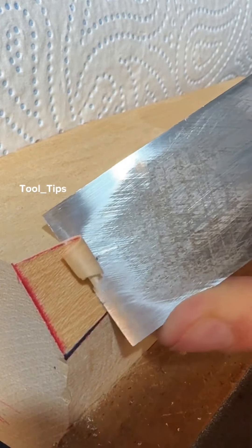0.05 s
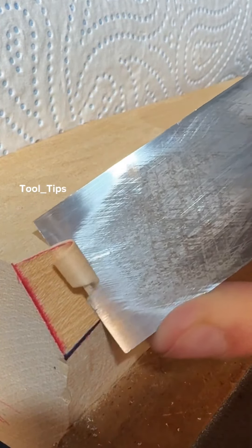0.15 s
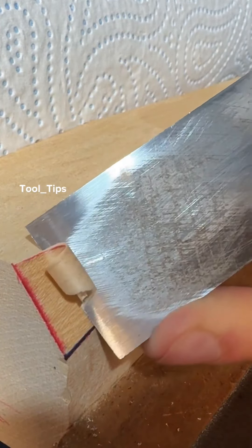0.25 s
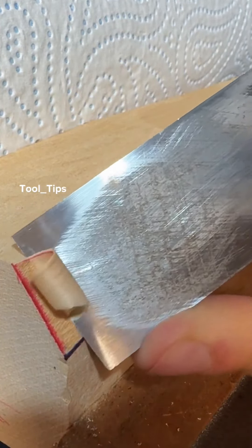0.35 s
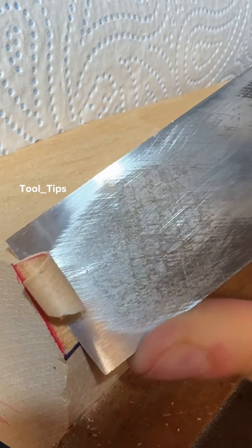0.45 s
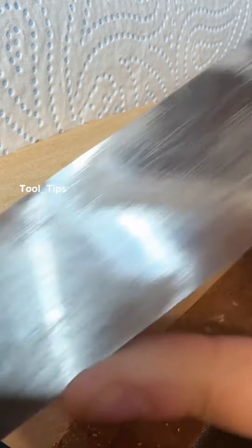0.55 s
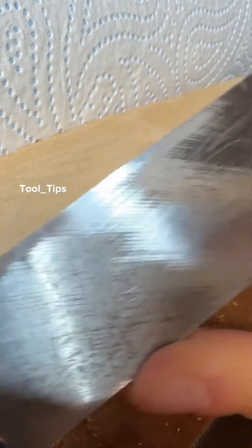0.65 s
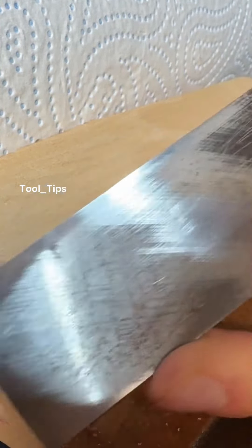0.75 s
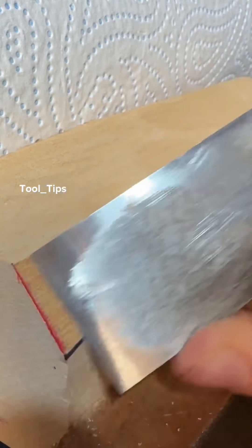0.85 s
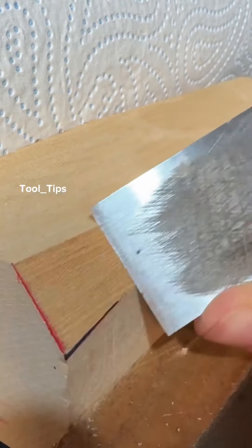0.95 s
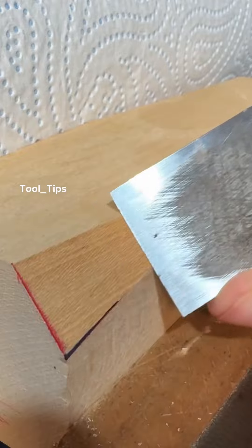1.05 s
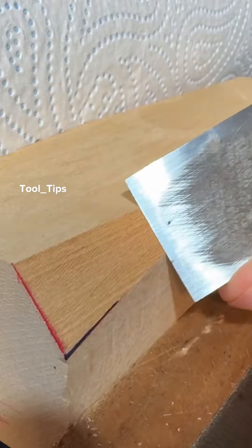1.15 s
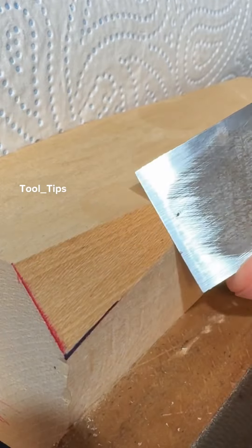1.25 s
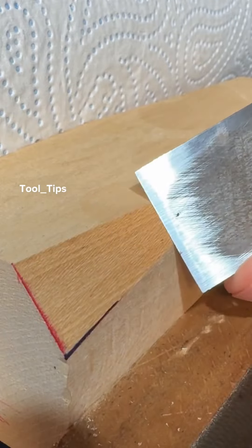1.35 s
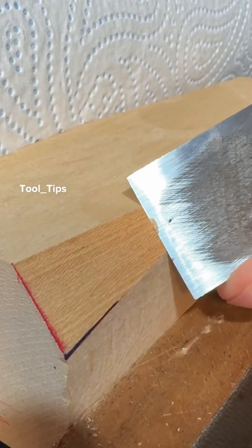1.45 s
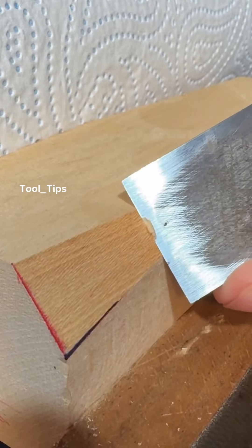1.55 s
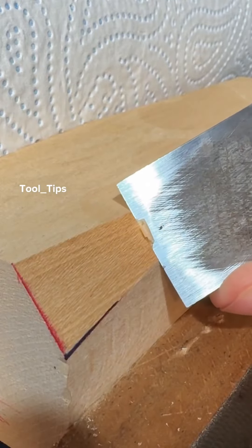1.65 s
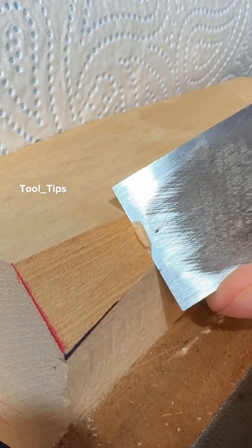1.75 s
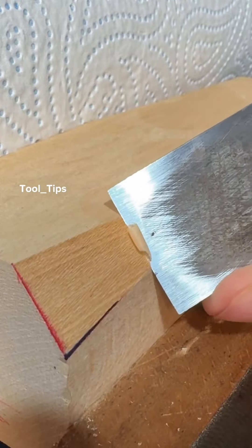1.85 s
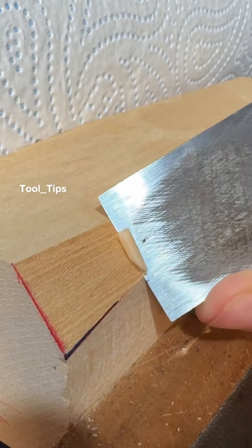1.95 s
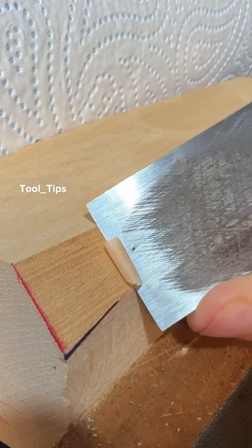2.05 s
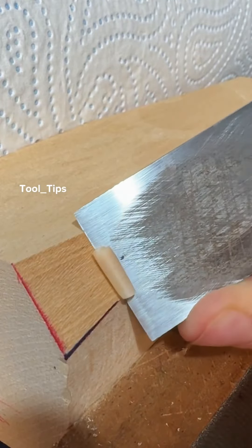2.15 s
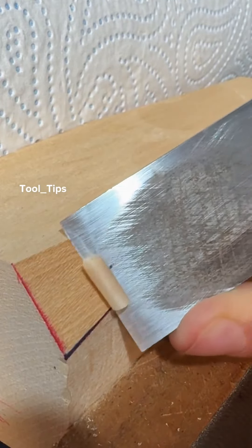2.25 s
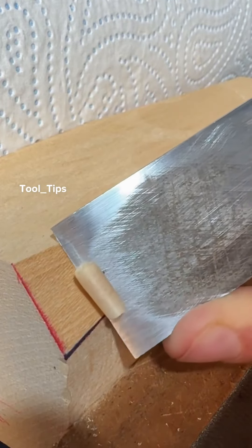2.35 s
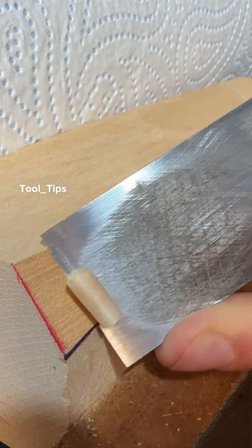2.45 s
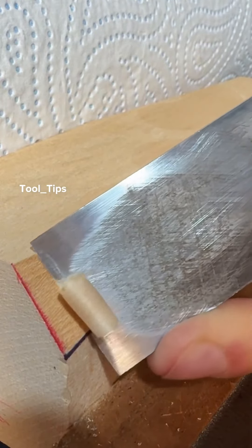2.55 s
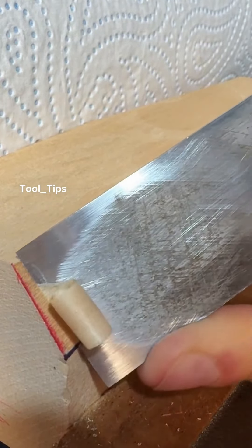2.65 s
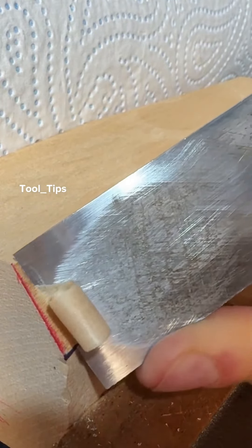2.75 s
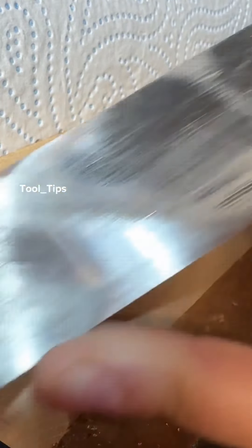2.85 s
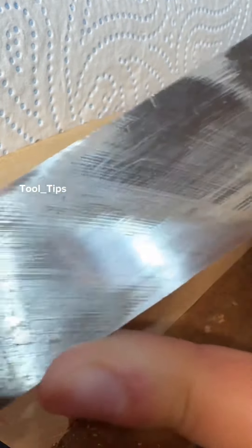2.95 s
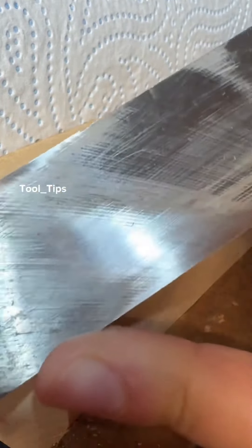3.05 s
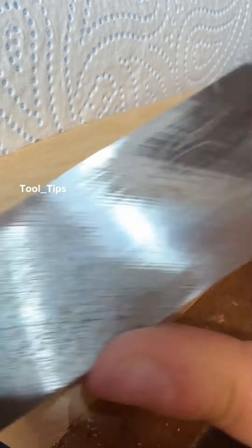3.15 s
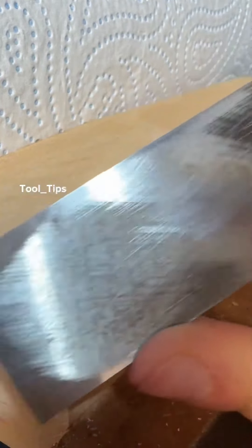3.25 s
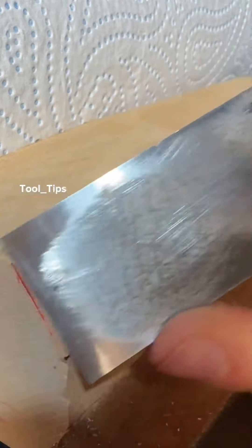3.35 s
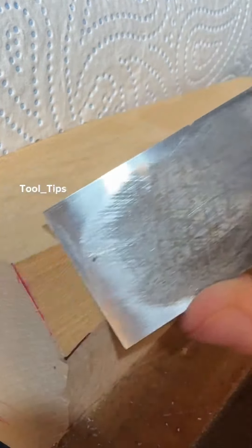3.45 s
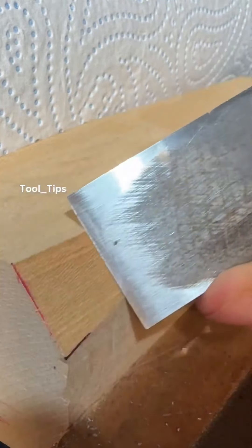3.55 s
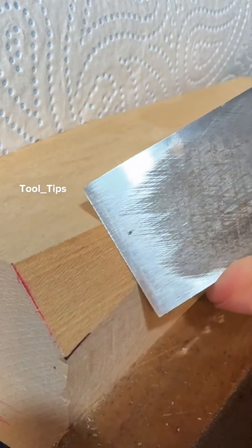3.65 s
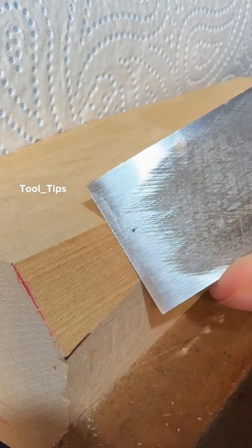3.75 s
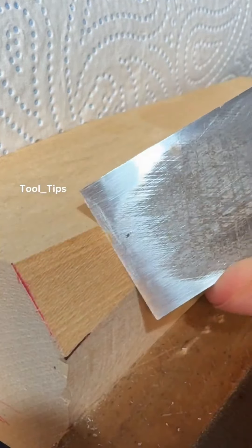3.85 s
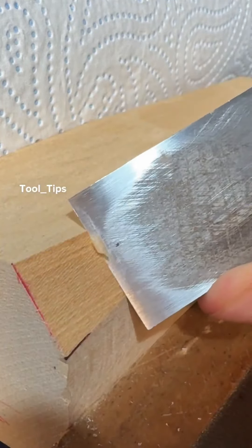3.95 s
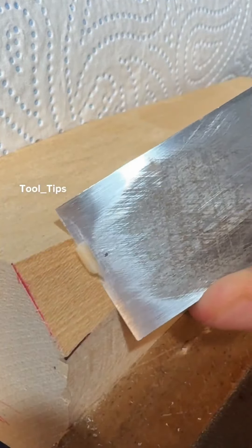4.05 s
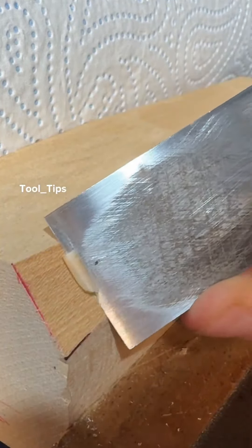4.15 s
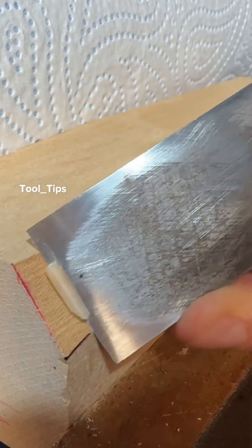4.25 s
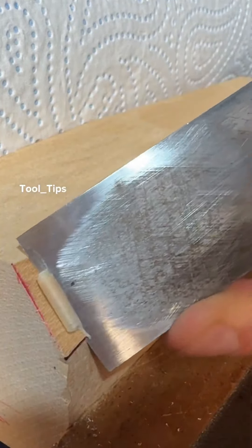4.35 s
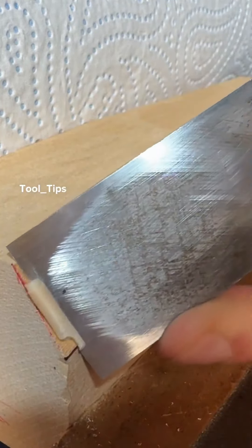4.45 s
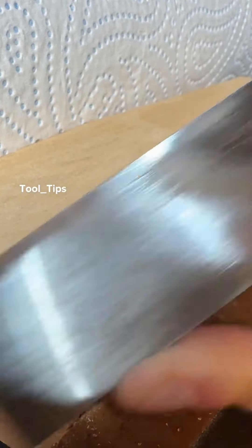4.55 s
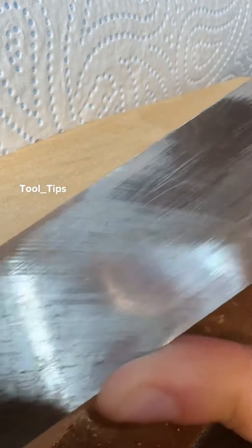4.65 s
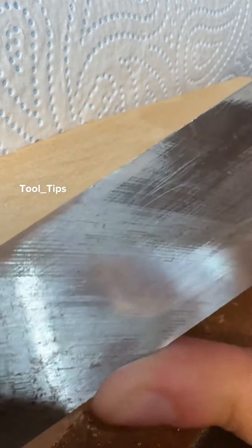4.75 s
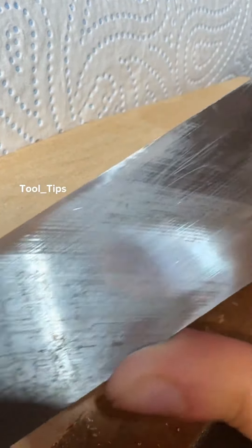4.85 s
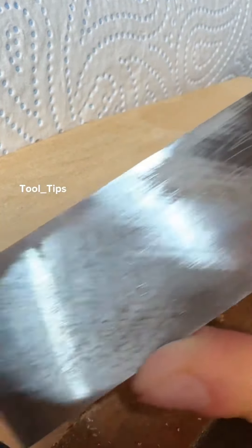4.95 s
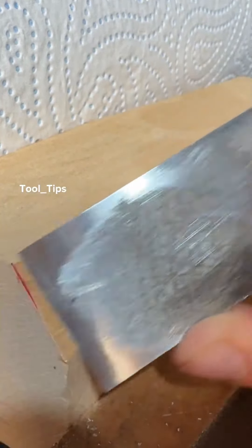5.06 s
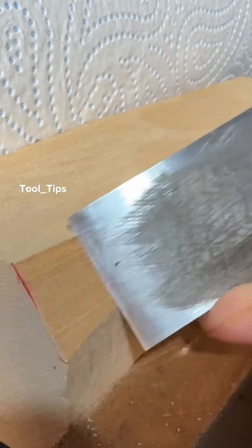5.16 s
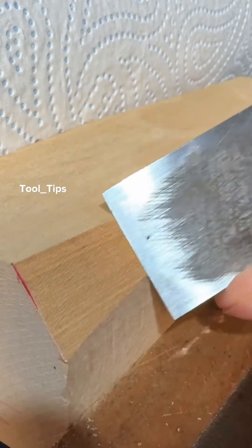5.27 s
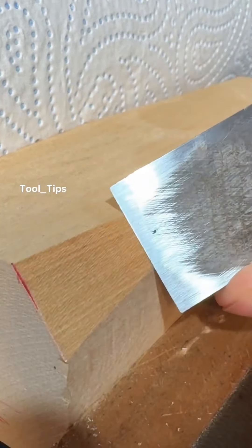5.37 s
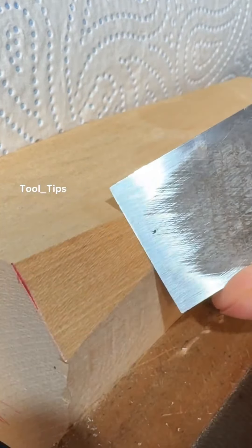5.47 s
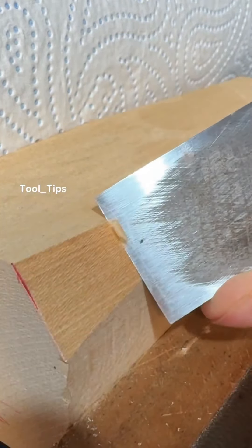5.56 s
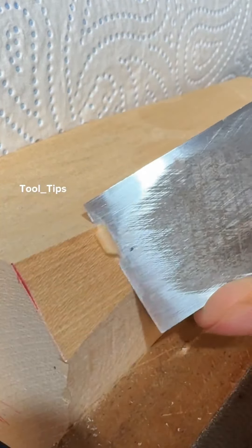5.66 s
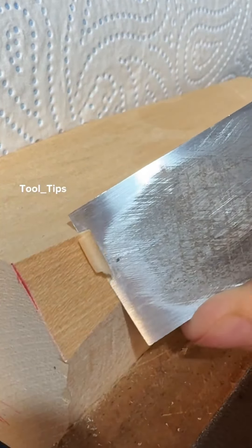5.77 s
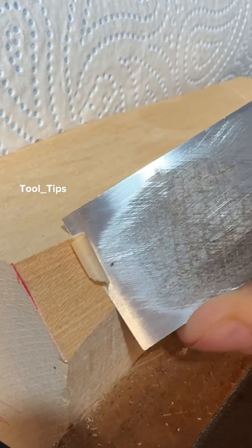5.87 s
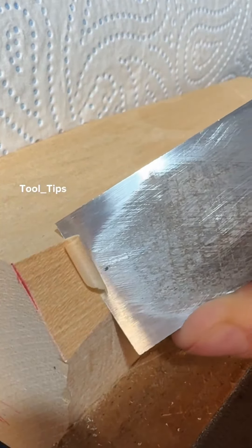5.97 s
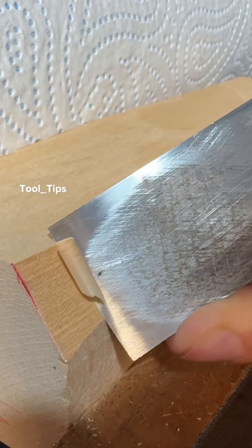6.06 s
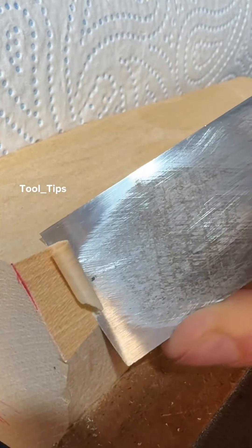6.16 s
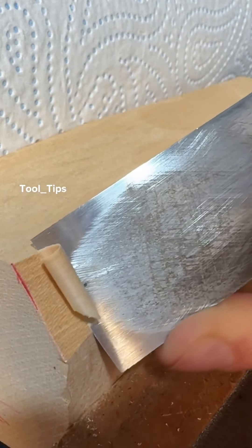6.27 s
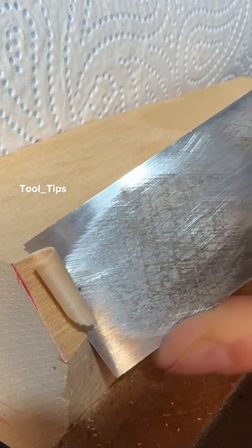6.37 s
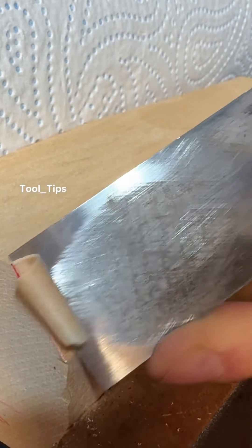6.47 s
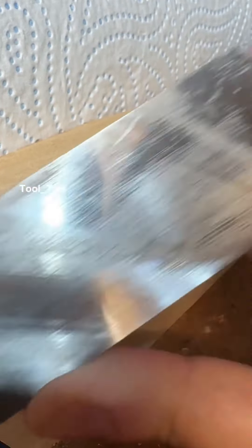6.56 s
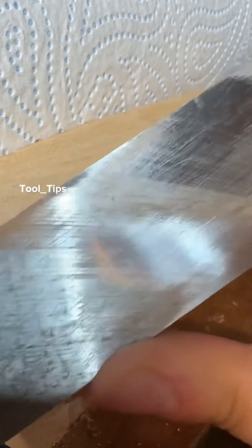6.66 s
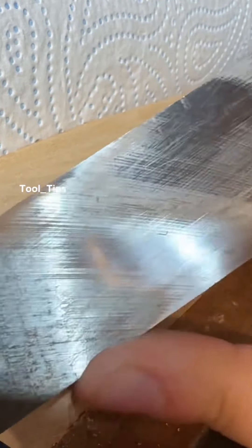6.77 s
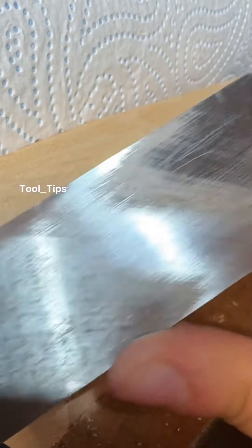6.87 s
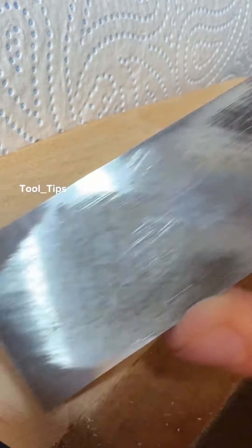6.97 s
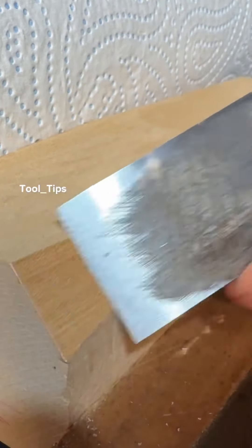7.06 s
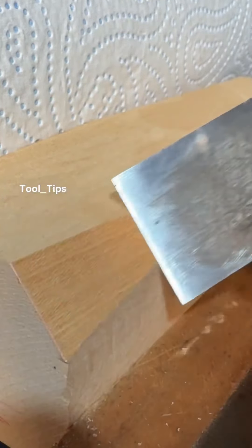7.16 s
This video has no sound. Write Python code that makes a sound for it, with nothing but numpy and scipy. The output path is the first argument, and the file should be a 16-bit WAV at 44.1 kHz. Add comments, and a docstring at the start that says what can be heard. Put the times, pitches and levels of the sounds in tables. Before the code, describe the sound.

A hand scraper shaves a wooden block on a bench, heard from centimetres away with little echo. Gritty, fibrous scraping comes in uneven pulls, growing coarser until the shaving rips away and the bench thuds. The blade then rubs back quietly with thin hiss, scuffs and ticks. Four cuts are heard; the last two releases bring strong knocks, one dull and faintly ringing, one bright and hard. Faint room air lies below.

```python
"""In a small, dry workshop, a phone lies close to a bench where a steel card scraper cuts a wooden block four times.
Surging noise of tearing fibres rings the modes of block and blade, and each shaving tears off in a last pull.
The bench thumps in decaying modes; bumps and crumpling bursts ring wood modes with noise clatter, two of them
loud, the first dull, the second hard and bright. The freed blade sounds a note. Between cuts it slides lightly
back with a finer hiss; noise cracks make ticks, and bench rumble lies below. Two microphone ports hear it with
glances off the bench, a short noise-built echo and quiet room air."""
import sys
import numpy as np
from scipy import signal
from scipy.fft import rfft, irfft
from scipy.io import wavfile
from scipy.ndimage import uniform_filter1d

SR = 44100
rng = np.random.default_rng(int(sys.argv[2]) if len(sys.argv) > 2 else 0)


def inscribe(sig):
    """Save sig as 16-bit PCM at rate SR to the path in sys.argv[1].

    A 1-D sig is mono; a 2-D sig holds one channel per row.
    Samples are clipped to [-1, 1] before scaling.
    """
    pcm = np.round(np.clip(np.atleast_2d(sig).T, -1, 1) * 32767)
    wavfile.write(sys.argv[1], SR, pcm.astype(np.int16))


N = 317940
TIME = np.arange(N) / SR
FREQS = np.fft.rfftfreq(8192, 1 / SR)
RING_TIME = TIME[:SR // 2]  # half a second for each single event

# Resonances of block and blade pressed together: f/Hz, width/Hz, level over the broad spectrum/dB
BODY_MODES = [(197, 27, 7), (354, 33.5, 13.5), (471, 50, 10), (610, 14, 18.5), (781, 35, 7),
              (1033.3, 24.3, 17.5), (1335, 38, 13.5), (1572, 69, 12.5), (1853, 42, 7), (2070, 20, 11.5),
              (2277, 98, 9), (2316, 69, 13.5), (2580, 30, -12), (3780, 1030, 0), (5725, 21, 3),
              (6670, 57, 11), (7003, 200, 11.5), (7540, 980, 3.5)]
# Range of the blade's main resonances: lower f/Hz, upper f/Hz
BLADE_RANGE = (1800, 3200)
# Broad spectrum of cutting: f/Hz, level/dB
CUT_SPECTRUM = [(170, 0.5), (400, -11.5), (800, -11.5), (1200, -19.5), (2000, -8), (3000, -11.5),
                (4700, -18), (6000, -13), (8400, -16), (9600, -9), (13000, -19.5), (15200, -7.5)]
# Surges of the edge between stalls: start t/s, length t/s, level before band trims/dB,
# weight of the wood/dB, extra ring of the blade/dB
EDGE_SURGES = [(-.03, 0.084, -31.5, -6, 3), (0.085, 0.13, -37, -1.5, 0), (0.221, 0.12, -40, -7.5, 0),
               (0.277, 0.087, -34, -1, -2), (0.506, 0.013, -35.5, -5, 8), (0.585, 0.06, -45.5, 0, -1),
               (1.371, 0.098, -43, -3.5, 2.5), (1.506, 0.095, -41, -3, 2.5), (1.654, 0.12, -47, -1.5, 2),
               (1.799, 0.12, -40.5, -1.5, 0.5), (1.92, 0.089, -38, 0.5, 2), (2, 0.11, -42, -3, -1),
               (2.084, 0.086, -36.5, -1.5, 0.5), (2.181, 0.11, -36.5, 0.5, -3.5),
               (2.361, 0.11, -38.5, -3, -3), (2.484, 0.058, -44, -4.5, -1), (2.543, 0.059, -35, -3.5, -1.5),
               (2.602, 0.033, -35.5, 3.5, 1), (3.8, 0.12, -38.5, -4.5, 3), (3.968, 0.11, -36, -5, 1.5),
               (4.089, 0.14, -41.5, 2.5, 1.5), (4.167, 0.065, -33.5, -19, 4.5), (4.236, 0.069, -38.5, 1, 3),
               (4.324, 0.09, -43.5, -1, 0), (4.422, 0.1, -40, -2, -1.5), (5.503, 0.11, -36, -4.5, 3),
               (5.635, 0.12, -34, -4.5, 5), (5.799, 0.16, -43, -0.5, -1), (5.965, 0.14, -44.5, 0, -2),
               (6.068, 0.062, -41, 0, 2), (6.124, 0.14, -44, -1.5, -7), (6.227, 0.082, -42.5, 0.5, 2),
               (6.331, 0.043, -40, 2.5, 1.5), (6.388, 0.085, -34.5, -3, 1.5)]
# Strokes and tears; the last listed row whose first time has passed sets the depth:
# depth clock start t/s, rise to full depth t/s, tear start t/s, last pull length t/s,
# tear level before band trims/dB, weight of the wood/dB
CUT_STROKES = [(-1, .8, 0.4623, 0.024, -25.5, -4.5), (-0.9, 3.9, 2.745, 0.039, -26, -7.5),
               (7.5, 0.18, 4.529, 0.0086, -27.5, -3.5), (3.5, 0.065, 6.467, 0.017, -23.5, -4)]
# Broad spectrum of sliding: f/Hz, level/dB
SLIDE_SPECTRUM = [(170, 6.5), (400, -2.5), (800, -8), (1250, -11), (2000, -9.5), (3000, -5.5), (4700, -11),
                  (6000, -3.5), (8400, -10.5), (9600, -5.5), (13000, -16.5), (15600, -13)]
# Way back as touch, scuff and glide, levels before band trims: touch t/s, touch level/dB,
# scuff t/s, scuff length t/s, scuff level/dB, glide length t/s, glide level/dB
SLIDES_BACK = [(.757, -47, .826, .028, -29, .39, -48.5), (3.102, -55, 3.275, .07, -40.5, .42, -53),
               (4.964, -55, 5.016, .125, -38.5, .3, -45), (6.9, -53, 6.985, .1, -36, .25, -44.5)]
# Skids of the edge: start t/s, length t/s, level/dB
EDGE_SKIDS = [(0.295, 0.011, -32.5), (0.829, 0.012, -32.5), (6.602, 0.016, -26.5)]
# Whispers of the lightly rubbed blade: start t/s, length t/s, first f/Hz, last f/Hz, level/dB
BLADE_WHISPERS = [(.785, .09, 2450, 2650, -47), (3.42, .14, 3640, 3640, -67)]
# Dull wooden bumps, and short broad bursts as a torn shaving crumples; two are loud, the first dull,
# the second hard and bright: t/s, peak level/dB, low-pass cut-off f/Hz, weight of low modes/dB
BUMPS_AND_BURSTS = [(.13, -31, 1100, -4), (.612, -32, 2600, -3), (0.762, -32, 2600, 3),
                    (.799, -32, 2600, 2), (0.882, -29, 750, -8), (1.088, -40, 1500, 1),
                    (1.228, -41, 1200, 0), (2.797, -23, 1100, -2), (3.193, -37, 2600, 1),
                    (3.281, -33, 2600, 3), (3.295, -32, 900, 7), (3.321, -35, 1800, 4),
                    (4.574, -21, 2000, 0), (4.879, -38, 2600, -3), (6.265, -30, 1000, -2),
                    (6.519, -17, 2600, 2), (6.543, -22, 2200, 2), (6.991, -32, 2600, -1),
                    (4.6528, -3, 1900, 1), (6.618, -1, 7000, 4.5)]
# Modes rung by a bump or burst: f/Hz, level/dB, t60 t/s
WOOD_MODES = [(54, -11, .31), (184, 0, .054), (247, -6, .15), (351, -6, .09), (438, -12, .15),
              (502, 1, .059), (646, -2, .04), (770, -4, .058), (901, -7, .058), (1244, -16, .04),
              (1610, -13, .019), (1882, -19, .06), (2238, 0, .023), (2631, -4, .018), (3708, -4, .013)]
# Blade ringing free of the wood: t/s, note level/dB, shimmer level/dB
BLADE_TWANGS = [(0.6, -52, -59), (2.88, -52, -61), (4.6535, -23.5, -57)]
# High modes of the free blade: f/Hz, level/dB
FREE_BLADE_MODES = [(2260, -3), (5130, -9), (5275, -4), (5330, -4), (5745, -8), (6020, -5), (6950, -7)]
# Splinters crack and the edge touches down: t/s, peak level before trim/dB, tail t60 t/s
CRACKS = [(3.192, -20, 0.03), (4.1133, -27, 0.012), (4.2553, -16.5, 0.029), (4.53, -25, 0.015),
          (4.903, -30, 0.016), (4.969, -28, 0.013), (6.861, -21.5, 0.067), (6.9017, -20, 0.034)]
# Broad spectrum of a tick: f/Hz, level/dB
TICK_SPECTRUM = [(150, 8), (1200, -8), (2500, -9), (5000, -17), (7000, -9), (10000, -8), (15000, -10)]
# Bench springs back as a shaving lets go or the edge stalls hard:
# t/s, peak level/dB, contact cut-off f/Hz
BENCH_RELEASES = [(0.512, -14, 382), (2.799, -11, 236), (2.932, -30, 202), (4.127, -34, 154),
                  (4.574, -11.5, 240), (5.742, -22.5, 108), (6.5, -14, 297), (6.529, -20, 400)]
# Modes of the sprung bench: f/Hz, level/dB, t60 t/s
BENCH_MODES = [(44, -7, 0.42), (78, 3, 0.22), (107, -3, 0.1), (191.6, -9, 0.18), (248, -8, 0.24)]
# Spectrum of the shaking bench: f/Hz, level/dB
BENCH_SPECTRUM = [(20, -22), (33, 6.5), (45, -1.5), (56, -2.5), (74, 4.5), (105, -2.5), (145, -6),
                  (200, -13.5), (300, -20.5), (900, -70), (16000, -130)]
# Phase by which the left microphone port leads: f/Hz, phase/rad
PORT_LEAD = [(0, 0), (1050, .5), (1600, .05), (5800, -.1), (8500, -1.1), (10500, -2.3), (12500, -3.1),
             (15500, -4.1)]
# Colour of sound scattered by the bench top, opposite in sign left and right: f/Hz, level/dB
BENCH_SCATTER = [(40, -60), (120, -3.5), (300, -20.5), (700, -3.5), (2200, -13), (4500, -0.5), (7000, -12),
                 (9500, -18), (12500, 10), (15500, -16)]
# Spectrum of the quiet workshop: f/Hz, level/dB
AIR_SPECTRUM = [(25, 3), (80, -5.5), (140, -12.5), (300, -12.5), (700, -23.5), (1500, -31), (5000, -40),
                (10000, -41.5), (16000, -53)]

SHALLOW_BITE_DB, DEEP_BITE_DB = -25, -3.5  # a shallow edge has less top
CATCH_S, STALL_S = 0.026, 0.036  # the edge catches quickly and stalls
STALL_CURVE = 1.37  # it brakes ever harder
CREST_DB, FLANK_DB, CREST_SHARE = -0.27, -8.5, 0.58  # arch of a surge, crest at this share of its length
# after the last pull, the wood is heard a little longer than the edge and the shaving rustles on
TEAR_EDGE_S, TEAR_WOOD_HOLD_S, TEAR_WOOD_S = 0.038, 0.029, 0.043
TEAR_RUSTLE_S, TEAR_BITE_DB = 0.047, -2.5
FLEX_S, FLEX_PER_S = 0.00022, 45  # blade waver: delay spread, changes per second
LAND_S, SCUFF_FADE_S, LIFT_S, GLIDE_SAG_DB_PER_S = 0.007, 0.036, 0.01, 28
SKID_HZ, SKID_STOP_S = 2340, 0.0029
LOW_MODES_HZ = 400
GLANCE_DB, GLANCE_BELOW_DB = 4, -30  # full spread of mode levels, for peaks at or below this
NOTE_HZ, NOTE_T60_S, NOTE_RISE_S, NOTE_FREE_S, NOTE_DAMP_S = 1044, 0.3, 0.005, 0.065, 0.012
SHIMMER_RISE_S, SHIMMER_T60_S = 0.025, 0.5
HANDS_DB, DRAG_LAG_S = -52, 0.019  # tremble under the hands; lag behind the drag of the edge
SWAY_DB, SWAY_S = -13, 0.094  # level relative to the release peak, decay time
HIT_ECHO_DB = -3  # blows travel mostly through the bench and stir the room less
AIR_DB = -48.5
TOP_HZ = 16000  # upper limit of the phone
OPPOSITE = np.array([[1], [-1]])  # signs at left and right port


def undb(db):
    """Decibels to gain."""
    return 10 ** (np.asarray(db) / 20)


def unit(x):
    """Scale to rms 1."""
    return x / np.sqrt(np.mean(x ** 2))


def band(x, lo_hz, hi_hz):
    """Band-pass without delay."""
    sos = signal.butter(3, [lo_hz, min(hi_hz, .49 * SR)], "band", fs=SR, output="sos")
    return signal.sosfiltfilt(sos, x)


def lowpass(x, order, cutoff_hz):
    """Low-pass: the duller the event, the lower its cut-off."""
    return signal.sosfilt(signal.butter(order, min(cutoff_hz, SR / 3), fs=SR, output="sos"), x)


def colour(x, points, modes=()):
    """Minimum-phase filter with a broad spectrum and resonances standing on it."""
    hz, db = np.transpose(points)
    peaks = 1 + sum(undb(d) ** 2 / (1 + (2 * (FREQS - f) / w) ** 2) for f, w, d in modes)
    broad = undb(np.interp(np.log(FREQS + 1), np.log(hz), db))
    cepstrum = irfft(np.log(broad * np.sqrt(peaks)))
    half = len(cepstrum) // 2
    folded = np.r_[cepstrum[:1], 2 * cepstrum[1:half], np.zeros(half)]  # makes the filter causal
    response = np.array(irfft(np.exp(rfft(folded))), ndmin=x.ndim)
    return signal.fftconvolve(x, response, axes=-1)[..., :x.shape[-1]]


def walk(rate, size=N):
    """Smooth chance with rms 1, changing about rate times a second."""
    knots = rng.standard_normal(size // 20)
    return unit(np.interp(TIME[:size] * rate, np.arange(len(knots)), knots))


def fade(t60):
    """Exponential decay over half a second."""
    return np.exp(-np.log(1000) * RING_TIME / t60)


def envelope(t, attack_s, length_s, release_s, curve=1):
    """Straight rise, hold, exponential release; a curve over 1 brakes it to a stop."""
    release = np.exp(-(np.maximum(t - length_s, 0) / release_s) ** curve)
    return np.clip(t / attack_s, 0, 1) * release


def add(track, start, sound):
    """Mix a sound in at a time."""
    i = int(max(start, 0) * SR)
    track[..., i:i + sound.shape[-1]] += sound[..., :N - i]


def cutting(edge_db):
    """The burr lifts a shaving in surges and tears it off with one last hard pull."""
    force = fibres(rate=8000, spread_db=-0.24, chatter_db=0.0, chatter_rate=490, grain_db=1.3, grain_rate=59)
    out = np.zeros((2, N))
    for start, db, ring_db, wood, edge, bite in surge_pulls() + tear_pulls():
        first = int(max(start, 0) * SR)
        run = force[:, first:first + len(RING_TIME)]
        modes = contact(ring_db, detune=0.0097, shade_db=2.0)
        add(out, start, undb(db) * rasp(run, CUT_SPECTRUM, modes, wood, edge * undb(edge_db), bite))
    return out


def surge_pulls():
    """Each surge catches, arches and stalls: start, level, blade ring, gains of wood, edge and bite."""
    pulls = []
    for start, length, db, wood_db, ring_db in EDGE_SURGES:
        t = RING_TIME - min(start, 0)  # a surge may already be under way at the start
        deep = depth(start + length / 2)
        arch = 1 - np.minimum((t / (CREST_SHARE * length) - 1) ** 2, 1)
        push = envelope(t, CATCH_S, length, STALL_S, STALL_CURVE)
        push = push * undb(CREST_DB * arch + FLANK_DB * (1 - arch))
        bite = undb(SHALLOW_BITE_DB * (1 - deep) + DEEP_BITE_DB * deep)
        pulls.append((start, db, ring_db, push * undb(wood_db), push, push * bite))
    return pulls


def tear_pulls():
    """Each tear swells to the break; edge, wood and rustle then die away at their own pace."""
    pulls = []
    for _, _, start, length, db, wood_db in CUT_STROKES:
        edge = envelope(RING_TIME, length, length, TEAR_EDGE_S, STALL_CURVE)
        wood = envelope(RING_TIME, length, length + TEAR_WOOD_HOLD_S, TEAR_WOOD_S)
        rustle = envelope(RING_TIME, length, length, TEAR_RUSTLE_S)
        pulls.append((start, db, 0, wood * undb(wood_db), edge, rustle * undb(TEAR_BITE_DB)))
    return pulls


def depth(time):
    """How far the burr has sunk in, 0-1: slowly at first, then faster up to full depth."""
    start, deepen_s = [row[:2] for row in CUT_STROKES if row[0] <= time][-1]
    return min((time - start) / deepen_s, 1) ** 2


def fibres(rate, spread_db, chatter_db, chatter_rate, grain_db, grain_rate):
    """Tiny uneven breaks, bunched by chatter and grain; rows: direct and scattered sound."""
    breaks = (rng.random(N) < rate / SR) * rng.standard_normal((2, N))
    sizes = undb(spread_db * np.minimum(rng.exponential(size=N), 5))
    return breaks * sizes * undb(chatter_db * walk(chatter_rate) + grain_db * walk(grain_rate))


def contact(ring_db, detune, shade_db):
    """A new point of contact may shift the resonances and let the blade ring more or less freely."""
    hz, width, db = np.transpose(BODY_MODES)
    shift, shade = rng.standard_normal((2, len(hz)))
    blade = (hz > BLADE_RANGE[0]) & (hz < BLADE_RANGE[1])
    shifted_hz = hz * (1 + detune * shift * np.minimum(hz / 2000, 1))
    return zip(shifted_hz, width, db + shade_db * shade + ring_db * blade)


def rasp(force, spectrum, modes, wood, edge, bite):
    """The force rings block and blade: pressure brings out the wood, a deeper bite the top."""
    sound = flex(colour(force, spectrum, modes))
    low, middle, top = band(sound, 165, 1300), band(sound, 1300, 8000), band(sound, 8000, 20000)
    return wood * unit(low) + edge * unit(middle) + bite * unit(top)


def flex(sound):
    """The blade bends under the fingers, so its main resonances waver."""
    blade, t = band(sound, *BLADE_RANGE), TIME[:sound.shape[-1]]
    bent = t + FLEX_S * walk(FLEX_PER_S, size=len(t))
    return sound - blade + np.array([np.interp(bent, t, row) for row in blade])


def streaks(sound, spread_db, rate):
    """As the edge crosses the grain, each resonance of the wood is fed by fits and starts."""
    out = sound
    for hz, width, _ in BODY_MODES:
        if hz < BLADE_RANGE[0]:
            ringing = signal.lfilter(*signal.iirpeak(hz, hz / (2 * width), fs=SR), sound)
            feed = unit(undb(spread_db * np.tanh(walk(rate))))
            out = out + ringing * (feed - 1)
    return out


def sliding(light_wood_db, scuff_wood_db, light_top_db, scuff_top_db):
    """The unloaded edge rubs back with a finer hiss; the scuff has less wood and more top."""
    force = fibres(rate=18000, spread_db=0.4, chatter_db=1.5, chatter_rate=450, grain_db=1.8, grain_rate=50)
    light, scuff = 0, 0
    for touch_s, touch_db, scuff_s, scuff_length, scuff_db, glide_length, glide_db in SLIDES_BACK:
        t = TIME - scuff_s
        touch = undb(touch_db) * envelope(TIME - touch_s, LAND_S, scuff_s - touch_s, LIFT_S)
        sag = undb(-GLIDE_SAG_DB_PER_S * np.maximum(t, 0))
        glide = undb(glide_db) * sag * envelope(t, LAND_S, glide_length, LIFT_S)
        light = light + touch + glide
        scuff = scuff + undb(scuff_db) * sag * envelope(t, LAND_S, scuff_length, SCUFF_FADE_S)
    wood = np.hypot(light * undb(light_wood_db), scuff * undb(scuff_wood_db))
    edge = np.hypot(light, scuff) * undb(-3.0)
    top = np.hypot(light * undb(light_top_db), scuff * undb(scuff_top_db))
    free_blade = contact(ring_db=6, detune=0, shade_db=0)
    return rasp(force, SLIDE_SPECTRUM, free_blade, wood, edge, top)


def skids(width_hz):
    """Short swelling bursts of noise around the blade's main resonance."""
    swell = 0
    for start, length, db in EDGE_SKIDS:
        corners = [start, start + length, start + length + SKID_STOP_S]
        swell = swell + undb(db) * np.interp(TIME, corners, [0, 1, 0])
    return swell * unit(band(rng.standard_normal(N), SKID_HZ - width_hz, SKID_HZ + width_hz))


def whispers(rate):
    """A thin resonance of the rubbed blade swells and may glide as the point of contact moves."""
    out, size = np.zeros(N), len(RING_TIME)
    for start, length, from_hz, to_hz, db in BLADE_WHISPERS:
        along = np.minimum(RING_TIME / length, 1)
        phase = 2 * np.pi * np.cumsum(from_hz + (to_hz - from_hz) * along) / SR
        tone = walk(rate, size=size) * np.sin(phase) + walk(rate, size=size) * np.cos(phase)
        add(out, start, undb(db) * np.sin(np.pi * along) * tone)
    return out


def bumps_and_bursts():
    """Bumps and crumpling bursts ring weighted modes; the lighter they are, the more their colour differs."""
    out = 0
    for start, db, cutoff_hz, weight_db in BUMPS_AND_BURSTS:
        spread_db = GLANCE_DB * min(db / GLANCE_BELOW_DB, 1)
        shades = spread_db * rng.standard_normal(len(WOOD_MODES))
        modes = [(hz, d + shade + weight_db * (hz < LOW_MODES_HZ), t60)
                 for (hz, d, t60), shade in zip(WOOD_MODES, shades)]
        out = out + blows([(start, db, cutoff_hz)], modes, rise_cycles=0.28)
    return out


def blows(events, modes, rise_cycles):
    """Each event rings the modes; a lower cut-off reaches fewer high ones."""
    ring = 0
    for k, (hz, db, t60) in enumerate(modes):
        cycles = hz * RING_TIME
        rise = np.minimum(cycles / rise_cycles, 1)  # low modes build up later
        sign = (-1) ** k  # neighbours swing in opposite directions
        ring = ring + sign * undb(db) * fade(t60) * rise * np.sin(2 * np.pi * cycles)
    out = np.zeros(N)
    for start, db, cutoff_hz in events:
        blow = lowpass(ring, 6, cutoff_hz)
        add(out, start, undb(db) * blow / np.abs(blow).max())
    return out


def clatter(db, t60):
    """Short decaying noise, mostly heard scattered, goes with each bump and burst."""
    out = np.zeros((2, N))
    for start, peak_db, cutoff_hz, _ in BUMPS_AND_BURSTS:
        burst = colour(rng.standard_normal((2, len(RING_TIME))) * fade(t60), CUT_SPECTRUM)
        burst = lowpass(burst, 4, cutoff_hz)
        add(out, start, undb(peak_db + db) * burst / np.abs(burst).max())
    return out * undb([[0], [8]])


def twangs(waver, flutter_db):
    """The freed blade sounds a note until the fingers damp it; a shimmer wavers as the hand turns it."""
    out, size = np.zeros(N), len(RING_TIME)
    held = envelope(RING_TIME, NOTE_RISE_S, NOTE_FREE_S, NOTE_DAMP_S)
    note = np.sin(2 * np.pi * NOTE_HZ * RING_TIME) * fade(NOTE_T60_S) * held
    swell = np.minimum(RING_TIME / SHIMMER_RISE_S, 1) * fade(SHIMMER_T60_S)
    for start, note_db, shimmer_db in BLADE_TWANGS:
        shimmer = 0
        for hz, db in FREE_BLADE_MODES:
            level = undb(db + flutter_db * walk(FLEX_PER_S, size=size))
            wavering_hz = hz * (1 + waver * walk(FLEX_PER_S, size=size))
            shimmer = shimmer + level * np.sin(2 * np.pi * np.cumsum(wavering_hz) / SR)
        add(out, start, undb(note_db) * note + undb(shimmer_db) * shimmer * swell)
    return out


def ticks(db, tail_db, side_db):
    """A sharp crack of noise with a short crumbling tail rings block and blade."""
    out = np.zeros((2, N))
    for start, peak_db, t60 in CRACKS:
        decay = fade(0.0024) + undb(tail_db) * fade(max(t60, .002))
        tick = colour(rng.standard_normal((2, len(RING_TIME))) * decay, TICK_SPECTRUM, BODY_MODES)
        add(out, start, undb(peak_db + db) * tick / np.abs(tick).max())
    mid, side = out
    return mid + undb(side_db) * side * OPPOSITE


def shaking(scrape):
    """The bench rumbles under the hands, follows the drag of the edge and sways after each release."""
    rumble = colour(rng.standard_normal(N), BENCH_SPECTRUM)
    swell = np.sqrt(uniform_filter1d(rumble ** 2, size=3000))
    drag = np.interp(TIME - DRAG_LAG_S, TIME, uniform_filter1d(np.abs(scrape), size=2200))
    sway = sum(undb(db + SWAY_DB) * envelope(TIME - start, 0.004, 0.0059, SWAY_S)
               for start, db, _ in BENCH_RELEASES)
    return rumble / swell * np.sqrt(undb(HANDS_DB) ** 2 + drag ** 2 + sway ** 2)


def workshop(direct, scattered, echoing, wet_db, t60, bass_hz):
    """Direct sound at two ports, glances off the bench from the sides, and a short room echo."""
    lead = np.interp(np.fft.rfftfreq(2 * N, 1 / SR), *np.transpose(PORT_LEAD))
    spectrum = rfft(direct, 2 * N)
    ports = np.array([irfft(spectrum * np.exp(1j * side * lead / 2))[:N] for side in (1, -1)])
    glances = colour(scattered, BENCH_SCATTER) * OPPOSITE
    echoes = rng.standard_normal((2, len(RING_TIME))) * fade(t60) * (RING_TIME > .004)
    echoes = band(echoes / np.sqrt(np.sum(echoes ** 2) / 2), bass_hz, 12600)
    wet = signal.fftconvolve(echoing[None], echoes, axes=1)[:, :N]
    return ports + glances + undb(wet_db) * wet


def air():
    """Low, steady room noise: a part common to both ports and a part opposite in sign."""
    mid, side = (unit(colour(rng.standard_normal(N), AIR_SPECTRUM)) for _ in range(2))
    return undb(AIR_DB) * (mid + band(side, 94, 18000) * OPPOSITE)


def scene():
    """Scraper, block and bench in the workshop."""
    cut = streaks(cutting(edge_db=-1.5), spread_db=5.5, rate=48)
    back = sliding(light_wood_db=-2, scuff_wood_db=-16.5, light_top_db=-13.0, scuff_top_db=-9.5)
    scrape = cut + back
    direct, scattered = scrape + clatter(db=-17.5, t60=0.045)
    rubbing = direct + skids(width_hz=340) + whispers(rate=87) + shaking(scrape[0])
    thuds = blows(BENCH_RELEASES, BENCH_MODES, rise_cycles=1.5)
    hits = bumps_and_bursts() + twangs(waver=.004, flutter_db=3.5) + thuds
    echoing = rubbing + undb(HIT_ECHO_DB) * hits
    room = workshop(rubbing + hits, scattered, echoing, wet_db=-7.0, t60=0.15, bass_hz=213)
    return room + ticks(db=-3.5, tail_db=-4, side_db=-7.5) + air()


def record(dry):
    """The phone cuts the deepest bass and the top."""
    x = signal.sosfilt(signal.butter(2, 24, "high", fs=SR, output="sos"), dry)
    return signal.sosfilt(signal.ellip(8, .2, 70, TOP_HZ, fs=SR, output="sos"), x)


dry = scene()
out = record(dry)
inscribe(out)
```